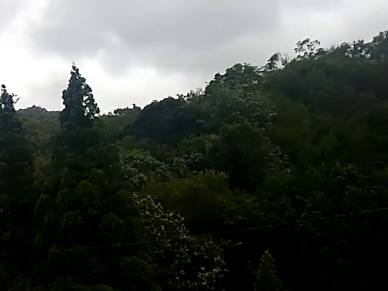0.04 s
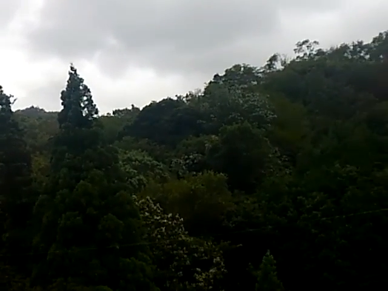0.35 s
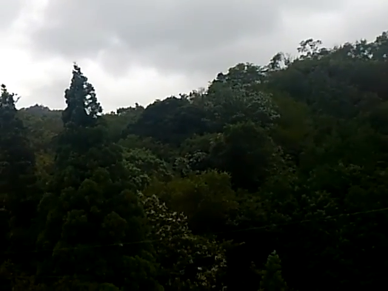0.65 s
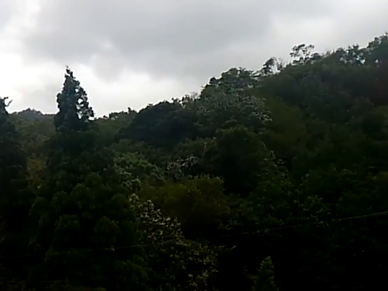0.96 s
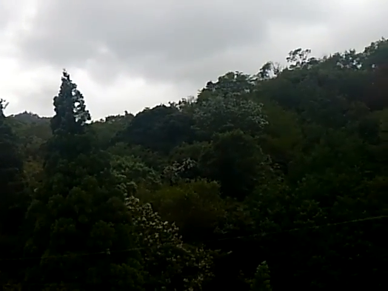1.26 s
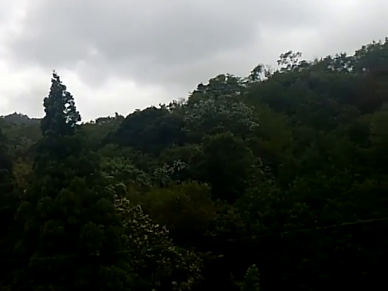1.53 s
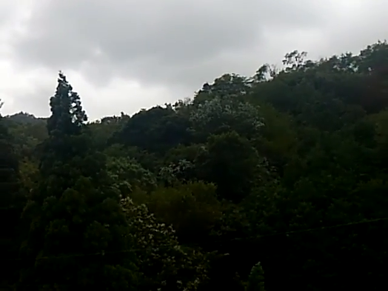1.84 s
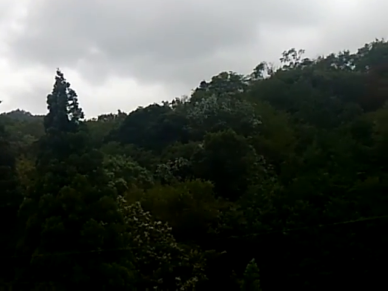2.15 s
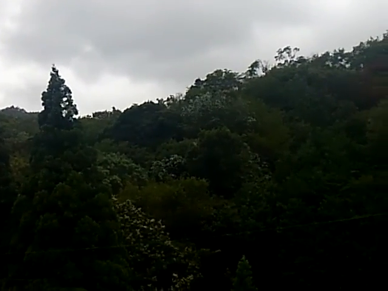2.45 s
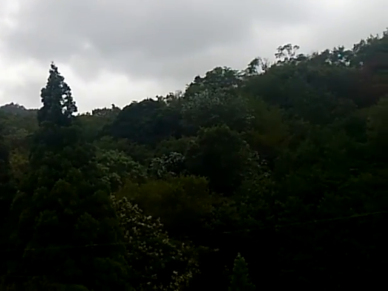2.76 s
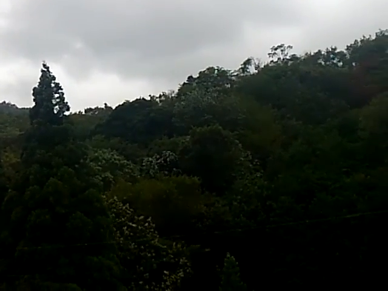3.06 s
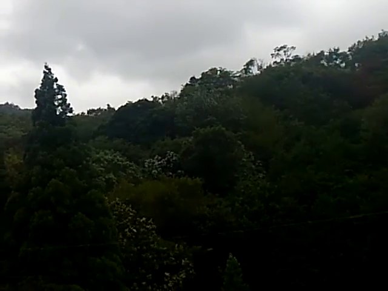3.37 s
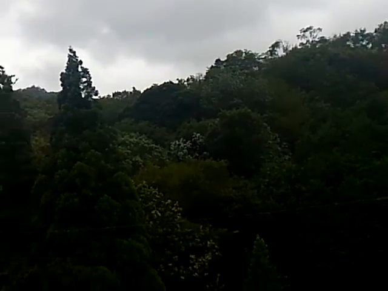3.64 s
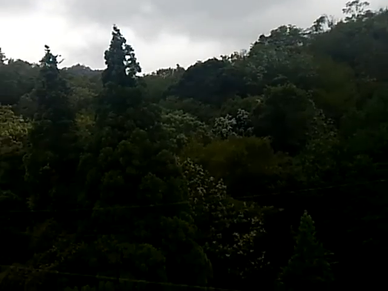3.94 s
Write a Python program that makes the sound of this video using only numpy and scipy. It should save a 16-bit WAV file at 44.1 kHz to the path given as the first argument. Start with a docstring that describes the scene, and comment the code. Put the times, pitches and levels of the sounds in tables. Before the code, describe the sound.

A gust of wind rumbles and thumps against the microphone outdoors, easing halfway through to a soft, low flutter. Behind it, forest trees roar softly, fine rain hisses on the leaves and far birds tick and peep faintly.

```python
"""Strong wind and rain on a wooded hillside. From the start a gust buffets the microphone with rumbles
and thumps, while trees roar, branches howl faintly and rain hisses on wet leaves. Just before one
second a far bird starts its thin, high ticks, and a second bird soon peeps lower. The gust dies down
and a drop splashes close by. Toward the end, air swirling off the microphone leaves a low flutter."""
import sys
import numpy as np
from scipy import signal
from scipy.fft import rfft, irfft
from scipy.io import wavfile
from scipy.ndimage import uniform_filter1d

SR = 44100
rng = np.random.default_rng(int(sys.argv[2]) if len(sys.argv) > 2 else 0)


def store_pcm(level_fs):
    """Save levels as 16-bit WAV."""
    pcm = np.round(np.clip(level_fs, -1, 1) * 32767).astype(np.int16)
    wavfile.write(sys.argv[1], SR, np.atleast_2d(pcm).T)


N = 176400
TIME_S = np.arange(N) / SR
FREQ_HZ = np.maximum(np.arange(N // 2 + 1) * SR / N, 1)


def gain(db):
    """Turn decibels into a number to multiply by."""
    return 10 ** (np.asarray(db) / 20)


def normalize(sound):
    """Scale a sound to an average (rms) size of 1."""
    return sound / np.sqrt(np.mean(np.abs(sound) ** 2))


def fade(rows):
    """Gain over time, joining (time_s, level_db) points."""
    time_s, level_db = np.array(rows, float).T
    return gain(np.interp(TIME_S, time_s, level_db))


def tone(rows):
    """Gain at each frequency, joining (frequency_hz, level_db) points."""
    frequency_hz, level_db = np.array(rows, float).T
    return gain(np.interp(np.log(FREQ_HZ), np.log(frequency_hz), level_db))


def filtered(sound, gains):
    """Turn each frequency up or down by its gain."""
    return irfft(rfft(sound) * gains, N)


def noise(gains):
    """Filtered noise with an average size of 1."""
    return normalize(filtered(rng.standard_normal(N), gains))


def wander(rate_hz):
    """A smooth random wobble, mostly slower than rate_hz."""
    return noise(1 / (1 + (FREQ_HZ / rate_hz) ** 4))


def whistle(pitch_hz, width_hz):
    """A breathy note: a narrow band of noise, shifted to follow a pitch."""
    home_hz = SR / 8
    band = signal.hilbert(noise(1 / (1 + ((FREQ_HZ - home_hz) / (0.65 * width_hz)) ** 2)))
    shift_hz = np.full(N, pitch_hz) - home_hz
    return np.real(band * np.exp(2j * np.pi * np.cumsum(shift_hz) / SR))


def restless(sound, bands_hz, swell_db, flicker_db):
    """Overlapping frequency bands swell together and flicker on their own."""
    total, swell = 0, swell_db * wander(0.7)
    for weights in np.eye(len(bands_hz)):
        band = filtered(sound, np.interp(FREQ_HZ, bands_hz, weights))
        total = total + band * gain(swell + flicker_db * wander(27))
    return total


def bird_call(peak_s, level_db, pitch_hz, length_s, width_hz):
    """One short, falling bird call, blurred by the forest."""
    age_s = TIME_S - peak_s
    swell = np.exp(-2 * (age_s / length_s) ** 2)
    fall_hz = 6000 * np.clip(age_s, -0.012, 0.012)
    note = swell * whistle(pitch_hz - fall_hz, width_hz)
    return gain(level_db) * normalize(note) * np.sqrt(np.mean(swell ** 2))


def birds():
    """One far bird ticks on a thin, high note; another peeps lower and farther off."""
    # each bird's calls: peak_s, level_db
    tick_calls = [(0.893, -52), (.976, -54), (1.088, -51), (1.143, -57), (1.463, -53), (2.471, -56),
                  (2.525, -50), (2.55, -53), (2.659, -56), (2.684, -53), (2.711, -56), (3.585, -52),
                  (3.665, -52), (3.692, -52)]
    peep_calls = [(1.286, -56), (2.89, -59), (3.015, -56)]
    ticks = sum(bird_call(*row, pitch_hz=8500, length_s=0.0079, width_hz=90) for row in tick_calls)
    peeps = sum(bird_call(*row, pitch_hz=5100, length_s=0.047, width_hz=550) for row in peep_calls)
    return ticks + peeps


def patter(drops_per_s=2000, spread_db=2.5, drop_share=0.33):
    """Countless drops of uneven size over the smooth hiss of those farther off."""
    # tone of rain on leaves: frequency_hz, level_db
    rain_tone = [(1500, -4), (3100, -6.5), (3950, 5), (4250, 0), (4700, -1), (5800, -1.5), (6600, 2),
                 (7100, -3), (8500, 4), (9400, 2), (10200, 6.5), (11100, 4.5), (12200, -7.5), (13000, -19)]
    hits = (rng.random(N) < drops_per_s / SR) * rng.choice([-1, 1], N)
    sizes = gain(spread_db * np.minimum(rng.exponential(size=N), 6))
    drops = np.sqrt(drop_share) * normalize(hits * sizes)
    hiss = np.sqrt(1 - drop_share) * rng.standard_normal(N)
    on_leaves = normalize(filtered(drops + hiss, tone(rain_tone)))
    return restless(on_leaves, bands_hz=np.linspace(3000, 13000, 20), swell_db=0, flicker_db=2.0)


def rain(width=0.8, wide_above_hz=4250):
    """Rain all around; only its high sounds spread to the left and right."""
    # loudness of the rain: time_s, level_db
    rain_levels = [(0, -52.5), (2, -51.5), (3.1, -50.5), (4, -50)]
    spread = width * 0.5 * (1 + np.tanh((FREQ_HZ - wide_above_hz) / 100))
    middle = filtered(patter(), 1 / np.hypot(1, spread))
    side = filtered(patter(), spread / np.hypot(1, spread))
    return np.array([middle + side, middle - side]) * fade(rain_levels)


def splash(fade_s=0.011):
    """A drop lands close by with a brief, high hiss."""
    # the close drop: peak_s, level_db
    landings = [(1.822, -49)]
    swell = sum(gain(db) * np.exp(-np.abs(TIME_S - peak_s) / fade_s) for peak_s, db in landings)
    return swell * whistle(pitch_hz=11000, width_hz=1000)


def tree_roar():
    """Wind roars in the near trees and, deeper, up the slope; leaves rustle nearby."""
    # tone of each layer: frequency_hz, level_db
    near_tone = [(60, 0.5), (150, 2), (260, 0), (350, -4.5), (500, -4), (620, -16.5), (800, -3.5),
                 (1120, 0.5), (1350, -3.5), (1490, -6.5), (1750, -5), (2200, -10), (3000, -19),
                 (5000, -28.5)]
    slope_tone = [(100, 5), (270, -1.5), (350, -16), (480, -1.5), (560, -2.5), (680, 2), (820, -2),
                  (1000, -39), (1500, -27.5)]
    leaf_tone = [(1800, -6.5), (2600, 10), (3800, 8), (4800, 11.5), (6500, -10)]
    # loudness of each layer: time_s, level_db
    near_levels = [(0, -48.5), (1.3, -44.5), (2.1, -47.5), (2.6, -46), (3.3, -46.5), (4, -45)]
    slope_levels = [(0, -57), (1.7, -54), (2.3, -48), (2.75, -50), (3.3, -48.5), (4, -54)]
    leaf_levels = [(0, -63), (1.2, -57.5), (1.8, -58), (2.3, -55.5), (2.55, -60), (4, -60)]
    near = noise(tone(near_tone)) * fade(near_levels)
    slope = noise(tone(slope_tone)) * fade(slope_levels)
    leaves = noise(tone(leaf_tone)) * fade(leaf_levels)
    bands_hz = np.geomspace(100, 5000, 10)
    return restless(near + slope + leaves, bands_hz, swell_db=1.13, flicker_db=1.22)


def branch_howls(sharpness=15.6, drift=0.011, flicker_db=1.5):
    """Branches sing in the wind: each note swells, slides slowly up or down in pitch, and fades."""
    # the howls: peak_s, swell_s, pitch_hz, glide_hz_per_s, level_db
    howls = [(0.37, 0.22, 1190, -2, -54.5), (1.35, 0.62, 970, -24.5, -51.5), (1.45, 0.62, 1275, 70, -51),
             (1.1, 0.59, 1900, 20, -54), (2.0, 0.39, 1980, -30, -54.5), (2.0, 0.3, 830, -49, -54.5),
             (2.2, 0.31, 2620, 1, -61), (2.8, 1, 1750, -15, -55.5), (2.7, .6, 1050, 70, -54),
             (3.1, 0.38, 815, -20.5, -58), (3, 0.6, 1400, -15.5, -57.5)]
    total = 0
    for peak_s, swell_s, pitch_hz, glide_hz_per_s, level_db in howls:
        age_s = TIME_S - peak_s
        wavering_hz = (pitch_hz + glide_hz_per_s * age_s) * (1 + drift * wander(3))
        note = whistle(wavering_hz, width_hz=pitch_hz / sharpness)
        swell = np.exp(-(age_s / swell_s) ** 2 / 2)
        total = total + note * swell * gain(level_db + flicker_db * wander(4.7))
    return total


def eddy(hit_s, release_s, dull_above_hz, rise_s=0.0023, hold_s=0.0045, swing_s=0.0076):
    """A swirl of air hits the microphone: a quick swing of pressure and a short, dull burst of noise."""
    age_s = TIME_S - hit_s
    swell = np.exp(-np.maximum(np.maximum(-age_s / rise_s, (age_s - hold_s) / release_s), 0))
    burst = swell * rng.standard_normal(N)
    # smooth out chance peaks in the burst's tone
    flatten = 1 / np.sqrt(uniform_filter1d(np.abs(rfft(burst)) ** 2, size=800))
    low_cut = FREQ_HZ ** 2 / (FREQ_HZ ** 2 + 29.2 ** 2)
    dulling = 1 / np.sqrt(1 + (FREQ_HZ / dull_above_hz) ** 5.02)
    high_cut = 1 / (1 + (FREQ_HZ / 2490) ** 10)
    thud = normalize(filtered(burst, flatten * low_cut * dulling * high_cut))
    # the swirl's core sucks, then pushes
    swing = gain(5) * np.tanh(3 * dull_above_hz * age_s) * np.exp(-np.abs(age_s) / swing_s)
    return swing + thud * np.sqrt(np.mean(swell ** 2))


def steady(sound, window_samples):
    """Even out a sound's chance rises and dips in loudness."""
    return sound / np.sqrt(uniform_filter1d(sound ** 2, size=window_samples))


def buffeting():
    """Rough air rumbles on the microphone, throbs as it peels off, and thumps it with single swirls."""
    # tone of the rumble: frequency_hz, level_db
    rumble_tone = [(8, 3), (22, 7), (40, 2.5), (85, -9.5), (135, -19), (230, -35), (500, -52), (1500, -95)]
    # loudness of the rumble and of the throb: time_s, level_db
    rumble_levels = [(0, -18), (.11, -23.5), (.19, -34.5), (.255, -13), (.33, -19), (.39, -18),
                     (.53, -19.5), (.57, -19.5), (.62, -21), (.68, -26), (.74, -27.5), (.8, -37.5),
                     (.87, -29), (1.0, -42), (1.09, -33.5), (1.28, -30), (1.34, -16.5), (1.45, -32.5),
                     (1.55, -33.5), (1.7, -36.5), (2.25, -46), (2.65, -57.5), (2.95, -39), (3.1, -46),
                     (3.18, -37), (3.35, -43), (4, -57)]
    throb_levels = [(0, -92), (2.6, -49.5), (3.3, -43.5), (3.55, -48), (3.63, -39.5), (4, -41.5)]
    # swirls that hit the microphone: hit_s, level_db, release_s, dull_above_hz
    swirls = [(0.116, -26.5, 0.0092, 159), (0.275, -18.5, 0.0027, 646), (0.288, -20, 0.02, 285),
              (0.371, -25.5, .015, 141), (.444, -24, 0.01, 182), (0.593, -16, 0.0033, 86),
              (0.601, -21, 0.016, 233), (1.091, -24, 0.0025, 49.5), (1.132, -36.5, 0.0063, 170),
              (1.326, -21.5, 0.0071, 79), (1.362, -27, 0.027, 223), (1.529, -42.5, 0.033, 199),
              (3.196, -28, 0.015, 48.7)]
    rumble = steady(noise(tone(rumble_tone)), window_samples=3500)
    throb = steady(whistle(pitch_hz=37.8, width_hz=3.3), window_samples=9000)
    thumps = sum(gain(db) * eddy(hit_s, release_s, hz) for hit_s, db, release_s, hz in swirls)
    return rumble * fade(rumble_levels) + throb * fade(throb_levels) + thumps


def scene():
    """Wind, birds and the splash in the middle, rain on both sides."""
    return buffeting() + tree_roar() + branch_howls() + birds() + rain() + splash()


def record(dry):
    """The recorder cuts off the highest sounds."""
    top_hz = 13000
    return signal.sosfilt(signal.ellip(10, 0.2, 80, top_hz, fs=SR, output="sos"), dry)


dry = scene()
out = record(dry)
store_pcm(out)
```